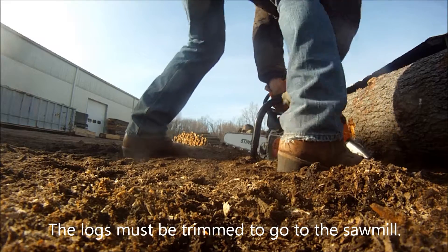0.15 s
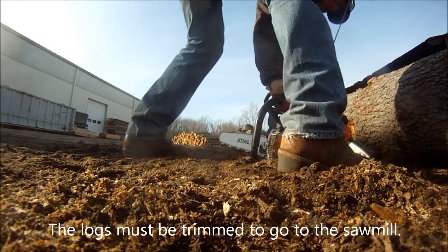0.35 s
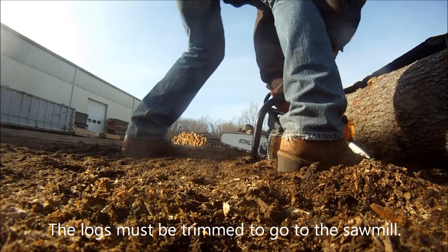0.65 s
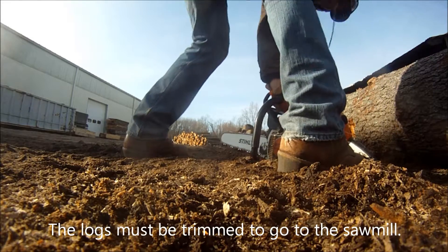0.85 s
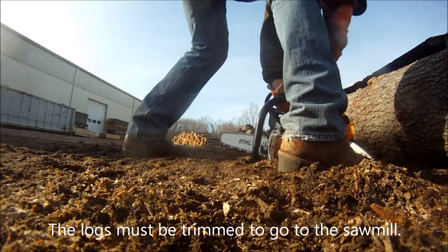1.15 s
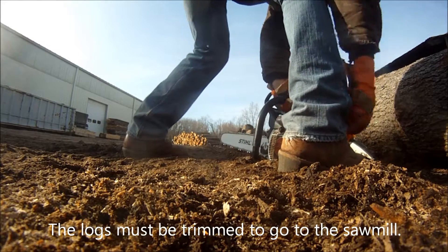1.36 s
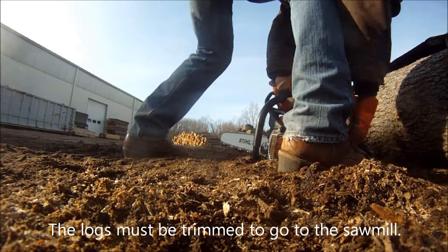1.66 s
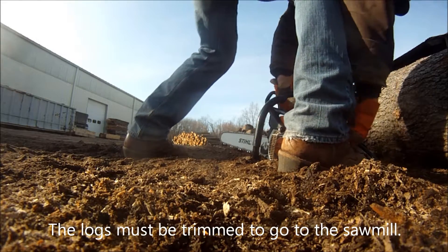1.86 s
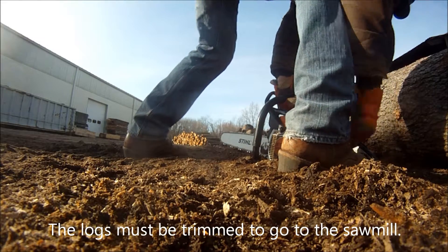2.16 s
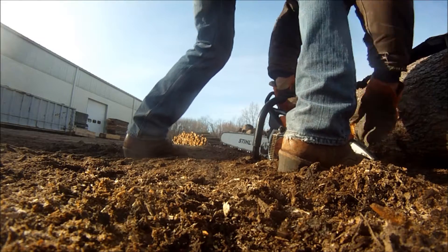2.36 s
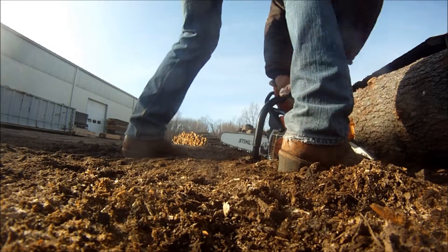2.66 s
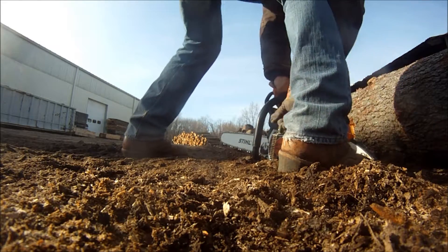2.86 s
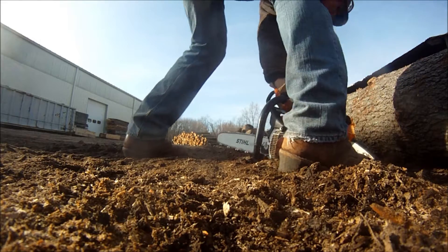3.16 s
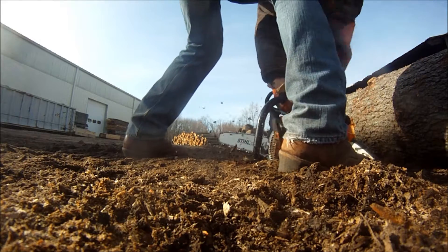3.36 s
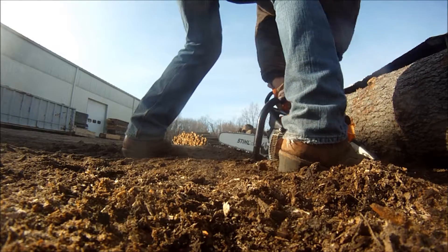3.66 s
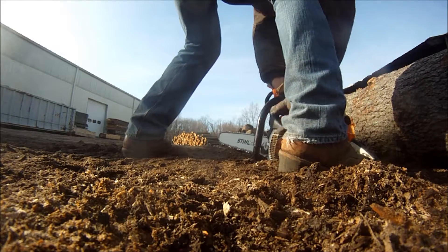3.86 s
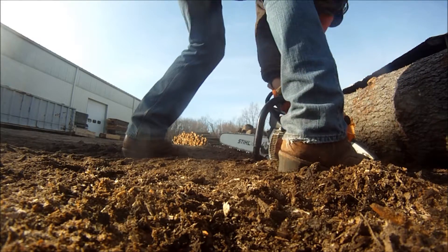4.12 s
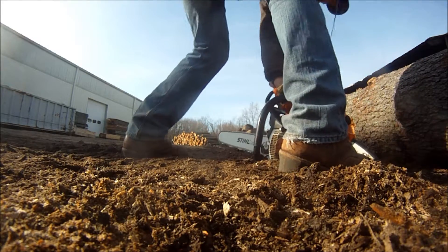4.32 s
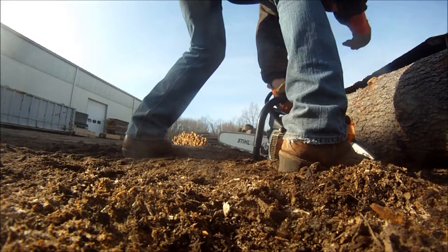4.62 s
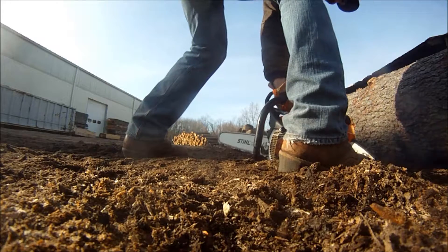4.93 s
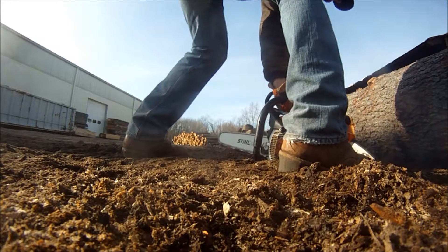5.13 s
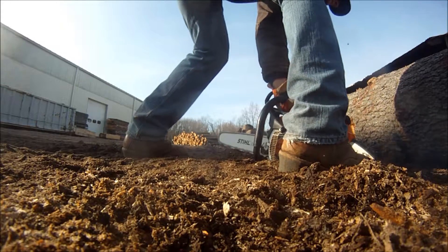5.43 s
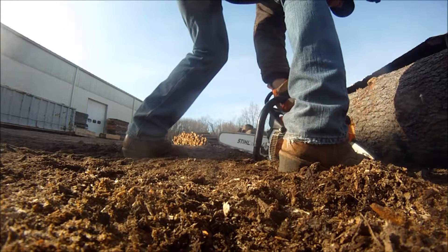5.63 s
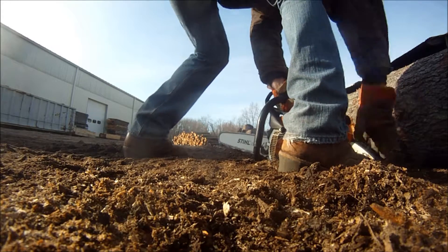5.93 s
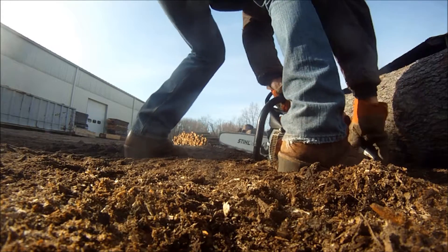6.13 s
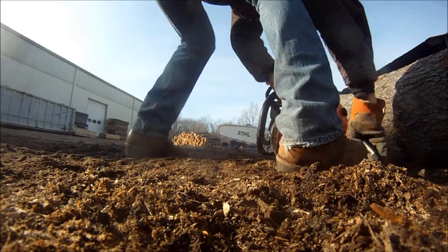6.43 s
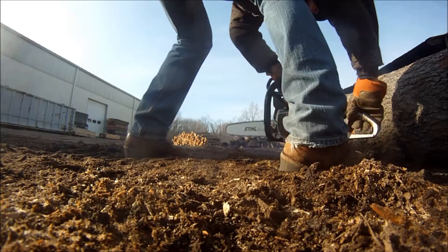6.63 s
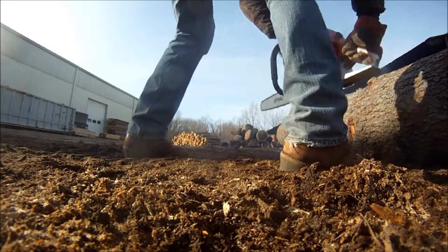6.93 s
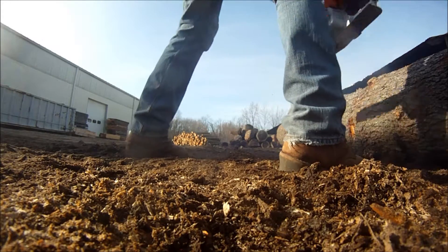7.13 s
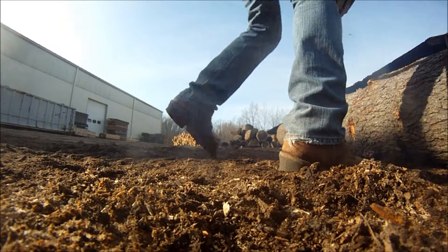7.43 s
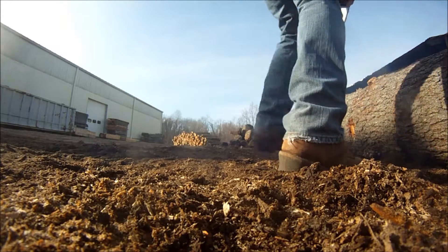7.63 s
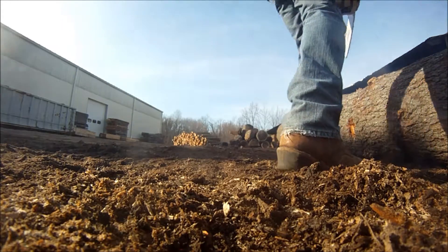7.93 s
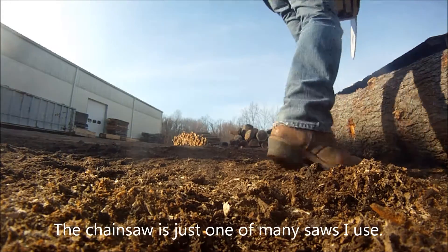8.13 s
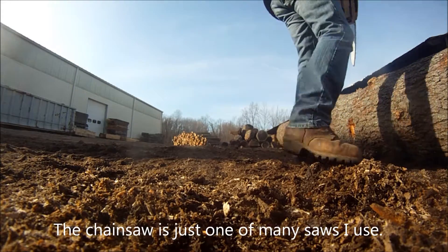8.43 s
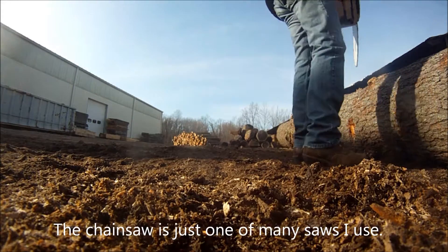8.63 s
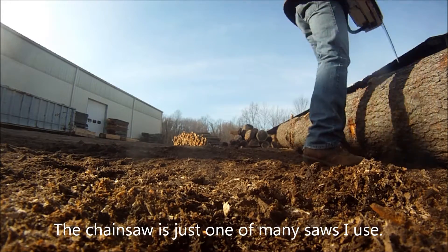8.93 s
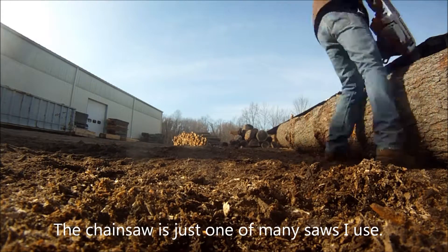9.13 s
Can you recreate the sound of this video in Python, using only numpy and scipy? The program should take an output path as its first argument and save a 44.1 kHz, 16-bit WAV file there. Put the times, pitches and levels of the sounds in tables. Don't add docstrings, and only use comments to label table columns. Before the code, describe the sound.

Outdoors over a faint diesel drone, failed chainsaw pulls clatter and putter out, then the two-stroke starts, buzzes fast, blips and cuts off.

```python
import sys
import numpy as np
from scipy import signal
from scipy.fft import rfft, irfft
from scipy.io import wavfile

SR = 44100
rng = np.random.default_rng(int(sys.argv[2]) if len(sys.argv) > 2 else 0)


def master(y):
    cut = np.clip(np.atleast_2d(y).T, -1, 1)
    pcm = np.round(cut * 32767)
    wavfile.write(sys.argv[1], SR, pcm.astype(np.int16))


def invert_db(level):
    return 10 ** (np.asarray(level, dtype=float) / 20)


N = 409240
TIME = np.arange(N) / SR

# (pitch_hz, width_hz, level_db)
PUMPING = [(155.9, 150, 3), (265.2, 175, 8)]
INTAKE = [(368.4, 128, 0.0024)]
MUFFLER = [(479, 114, 6), (612.7, 32, 2), (777, 43, -5.5)]
OUTLET = [(573.6, 150, 0)]
COVER = [(610, 130, 0), (720, 160, -4)]
# (time_s, low_casing_ring_db, intake_db, ground_bounce_lag_ms)
FLANK = [(6.1, 0.4, 1.7, 0.043), (6.18, -4, 19, 0.071), (6.3, 0.5, 14, .14), (6.7, 6, -1.5, 0.46),
         (6.95, 6.5, 5.5, .4), (7.15, -2, 8.5, 0.31), (7.35, -3, 0.5, .3), (8.9, 0.5, 1, 0.27)]


def in_time(rows):
    s, *columns = np.transpose(rows)
    return [np.interp(TIME, s, column) for column in columns]


def rms_one(x):
    return x / np.sqrt(np.mean(x ** 2) + 1e-20)


def noise():
    return rng.standard_normal(N)


def resonate(x, peaks, order):
    out = 0
    for k, (hz, width_hz, level_db) in enumerate(peaks):
        r = np.exp(-np.pi * max(width_hz, 20) / SR)
        top = [(1 - r * r) / 2, 0, (r * r - 1) / 2]
        bottom = [1, -2 * r * np.cos(2 * np.pi * hz / SR), r * r]
        ringing = x + 1e-18
        for _ in range(order):
            ringing = signal.lfilter(top, bottom, ringing)
        out = out + invert_db(level_db) * (-1) ** (k * order) * ringing
    return out


def unit_energy(x, peaks):
    soft = signal.butter(4, 760, fs=SR, output="sos")
    click = resonate(signal.sosfilt(soft, np.eye(1, SR // 10)[0]), peaks, order=2)
    heard = np.flatnonzero(x)
    busy = slice(heard[0], heard[-1] + SR // 10)
    out = np.zeros(N)
    ringing = resonate(signal.sosfilt(soft, x[busy] + 1e-18), peaks, order=2)
    out[busy] = ringing / np.sqrt(np.sum(click ** 2) / SR)
    return out


def clicks(times, gains):
    out = np.zeros(N)
    np.add.at(out, (np.asarray(times) * SR).astype(int), gains)
    return out


def swell(x, rise_s, fall_s):
    t = np.arange(int(.08 * SR)) / SR
    shape = np.exp(-t / fall_s) * (1 - np.exp(-t / rise_s))
    return signal.fftconvolve(x, shape / shape.max())[:N]


def after(s):
    return np.clip((TIME - s) / .018, 0, 1)


def slowing(first_s, gap_s, count):
    stretch = 1.158
    return first_s + gap_s * (stretch ** np.arange(count) - 1) / (stretch - 1)


def yard():
    # (time_s, turns_per_s, level_db)
    diesel = [(0, 43, -40), (2.36, 42.5, -41), (2.45, 41.5, -68), (2.7, 41, -56), (3.0, 40, -53),
              (3.36, 40, -53), (3.42, 34, -56), (4.2, 33, -54), (4.5, 33, -64), (8.2, 33, -66),
              (8.87, 33, -78)]
    # (level_at_high_idle_db, level_at_low_idle_db)
    diesel_parts = [
        (-13, -5),
        (-0.8, 3),
        (-26.5, 6),
        (-10, -1),
    ]
    # (pitch_hz, level_db per Hz)
    rumble_colour = [(12, -38), (20, -19.5), (103, -14), (124, -5), (169, -17), (458, -14.5), (1080, -40),
                     (3780, -44), (5800, -66), (7540, -83.5), (12800, -120)]
    speed, diesel_db = in_time(diesel)
    *orders_db, rumble_db = [diesel_db + np.interp(speed, [34, 40], part[::-1]) for part in diesel_parts]
    rumble_db = rumble_db + 13 * np.interp(TIME, [4.2, 4.5], [0, 1])
    turns = np.cumsum(speed) / SR
    slow = signal.butter(1, 6.0, fs=SR, output="sos")
    drone = 0
    for k, order_db in enumerate(orders_db):
        waver_db = 1.8 * rms_one(signal.sosfilt(slow, noise()))
        drone = drone + np.sqrt(2) * invert_db(order_db + waver_db) * np.sin(2 * np.pi * (k + 1) * turns)
    hz, level_db = np.transpose(rumble_colour)
    colour = invert_db(np.interp(np.log(np.fft.rfftfreq(N, 1 / SR) + 1), np.log(hz), level_db))
    rumble = rms_one(irfft(rfft(noise()) * colour, N))
    return drone + invert_db(rumble_db) * rumble


def clacks():
    # (time_s, bright_db, hollow_db, scrape_s)
    clack_rows = [(0.0503, -40.5, -30.5, 0.0018), (0.1267, -50.5, -40, 0.0022),
                  (0.226, -35.5, -19.5, 0.0059), (0.7705, -47, -49, 0.002), (0.827, -28, -11.5, 0.004),
                  (1.278, -21.5, -22, 0.0048), (1.6322, -24, -39, 0.0022), (2.0707, -39, -38, 0.0028),
                  (2.1316, -44.5, -53, 0.0066), (2.2109, -42, -38, 0.0034), (2.2566, -53, -49, 0.004),
                  (2.3486, -42.5, -35.5, 0.0017), (2.9928, -38, -21, 0.0036), (3.0864, -46, -39, 0.0016),
                  (3.2056, -22, -16.5, 0.0013), (3.2465, -44.5, -35, 0.0032),
                  (3.2701, -37.5, -21.5, 0.0018), (3.3764, -33, -16.5, 0.0035),
                  (3.4206, -42.5, -59, 0.0018), (3.4655, -38.5, -27, 0.003), (3.496, -50, -42, 0.0028),
                  (3.5688, -50, -37.5, 0.0048), (3.6227, -49.5, -48, 0.0068), (3.7299, -43.5, -47, 0.00092),
                  (3.776, -57, -55, 0.002), (4.1125, -43.5, -37, 0.0061), (4.1486, -41.5, -16, 0.0062),
                  (4.2178, -46.5, -39, 0.0031)]
    slaps = slowing(first_s=.4698, gap_s=.0515, count=5)
    rows = clack_rows + [(s, -41, -52 + 1.5 * k, .005) for k, s in enumerate(slaps)]
    scrape = np.zeros(N)
    t = np.arange(int(.06 * SR)) / SR
    for s, bright_db, _, scrape_s in rows:
        x = t / np.clip(scrape_s, .0003, .012)
        scrape[int(s * SR):][:len(t)] += invert_db(bright_db - 0.5) * x * np.exp(-x)
    s, _, hollow_db, _ = np.transpose(rows)
    hollow = unit_energy(clicks(s + 0.003, invert_db(hollow_db - 33.0)), COVER)
    return hollow, scrape * noise()


def cord():
    # (start_s, end_s, cover_db, casing_db)
    whirs = [
        (.228, 0.458, -45, -59.5),
        (0.837, .9, -41, -61),
        (3.004, 3.092, -52.5, -69.5),
        (4.107, 4.19, -47.5, -63),
    ]
    hollow, bright = np.zeros((2, N))
    for start_s, end_s, cover_db, casing_db in whirs:
        runs = after(start_s) - after(end_s)
        hollow = hollow + invert_db(cover_db) * runs
        bright = bright + invert_db(casing_db) * runs
    return hollow * rms_one(resonate(noise(), COVER, order=2)), bright * noise()


def cracks():
    # (time_s, peak_db)
    kickbacks = [(0.8276, -26), (1.278, -33), (1.953, -34), (2.9966, -37.5), (3.0867, -32), (3.2042, -33.5),
                 (3.3773, -34.5), (4.147, -33.5), (4.218, -24)]
    s, peak_db = np.transpose(kickbacks)
    hits = clicks(s + 0.00084, -invert_db(peak_db + 23.0))
    return resonate(hits, [(1090, 1020, 7.5), (1780, 600, -17)], order=2)


def strokes():
    # (time_s, peak_db)
    single_strokes = [(0.259, -28), (1.933, -14), (1.951, -10), (1.976, -19), (2.005, -17), (2.036, -15),
                      (2.059, -20), (2.1, -18), (2.122, -25), (2.181, -28), (2.194, -29), (2.216, -31),
                      (3.024, -31), (3.085, -18), (3.104, -26), (3.119, -24), (3.14, -26), (3.16, -23),
                      (3.185, -23), (3.205, -17), (3.231, -35), (3.253, -25), (3.302, -33), (3.325, -31),
                      (3.362, -28), (3.376, -17), (3.435, -34), (4.193, -12), (4.216, -9)]
    saw_air = PUMPING + INTAKE + MUFFLER
    down = slowing(first_s=.313, gap_s=.0305, count=10)
    down_db = -16 - 1.3 * np.arange(len(down))
    s, peak_db = np.transpose(sorted(single_strokes + list(zip(down, down_db))))
    hits = clicks(s + 0.00086, invert_db(peak_db))
    thud = invert_db(-30.5) * unit_energy(hits, [(203, 260, -0.42), (396, 220, -1.1)])
    bounce = invert_db(-11) * np.roll(thud, int(.008 * SR))
    breath = swell(hits, rise_s=.006, fall_s=.02)
    puff = invert_db(-29) * breath * rms_one(resonate(noise(), saw_air, order=2))
    gap = np.diff(s, append=9)
    late = clicks(s + np.minimum(0.35 * gap, .03), invert_db(peak_db - 39) * (gap > .028))
    return thud + bounce + unit_energy(late, saw_air) + puff, invert_db(-47.5) * breath * noise()


def firing_times(rows):
    out = []
    for (s, hiss_db, steps), (next_s, _, _) in zip(rows, rows[1:] + rows[-1:]):
        k = np.arange(max(round(steps), 1))
        uneven_db = -0.5 + 3.5 * rng.standard_normal(len(k))
        out += zip(s + k * (next_s - s) / len(k), hiss_db + (k > 0) * uneven_db)
    return out


def firings():
    # (time_s, hiss_db, even_steps_to_next_row)
    pull_firings = [(0.897, -39.5, 1), (0.989, -42, 1), (1.009, -39, 1), (1.134, -43, 1), (1.196, -40, 4),
                    (1.3, -43.5, 2), (1.381, -52.5, 4), (1.477, -55.5, 2), (1.537, -51.5, 2),
                    (1.641, -44, 1), (1.66, -45.5, 1), (1.721, -47.5, 1), (1.766, -50.5, 3),
                    (1.843, -53.5, 2), (1.905, -52.5, 1)]
    # (time_s, hiss_db, even_steps_to_next_row)
    run_firings = [(4.294, -47.5, 3), (4.428, -47.5, 4), (4.532, -46.5, 4), (4.643, -47, 3),
                   (4.709, -46.5, 2), (4.773, -45, 3), (4.887, -43.5, 1), (4.931, -46, 2),
                   (5.002, -45.5, 1), (5.04, -46, 2), (5.13, -47.5, 3), (5.249, -49.5, 1), (5.335, -43, 3),
                   (5.471, -50.5, 3), (5.587, -48.5, 2), (5.674, -49.5, 2), (5.753, -46, 5),
                   (5.947, -46.5, 3), (6.08, -50.5, 2), (6.147, -47, 4), (6.232, -64, 1)]
    s, hiss_db = np.transpose(firing_times(pull_firings) + firing_times(run_firings))
    lit = swell(clicks(s, invert_db(hiss_db)), rise_s=.007, fall_s=0.0073)
    boom = rms_one(resonate(noise(), OUTLET, order=2))
    kick = unit_energy(clicks(s + .003, invert_db(hiss_db - 6)), [(331, 310, 0)])
    return invert_db(12.0) * lit * boom + kick, invert_db(-1.0) * lit * noise()


def thumps():
    # (time_s, peak_db)
    lone_firings = [(7.738, -31.5), (7.791, -34.5), (7.852, -43), (7.919, -31), (7.961, -30), (8, -35),
                    (8.051, -30.5), (8.221, -30.5), (8.27, -34), (8.328, -36), (8.39, -33), (8.449, -31.5),
                    (8.521, -35), (8.578, -34.5), (8.629, -38), (8.679, -39.5), (8.728, -43), (8.757, -40),
                    (8.799, -56), (8.85, -44)]
    s, peak_db = np.transpose(lone_firings)
    return unit_energy(clicks(s, invert_db(peak_db - 24)), [(83, 300, 0.5), (314, 370, -1)])


def casing(rattle):
    # (pitch_hz, width_hz, level_db)
    casing_peaks = [(1166, 170, 2.5), (1550, 440, -4.5), (2166, 170, 0), (2473, 108, 3.5), (2940, 227, 6),
                    (3868, 238, 0), (5035, 407, -6), (1231, 16, 2)]
    ring_db, _, lag_ms = in_time(FLANK)
    rung = invert_db(ring_db) * resonate(rattle, casing_peaks[:2], order=1)
    rung = rung + resonate(rattle, casing_peaks[2:], order=1)
    ground = invert_db(-10)
    rung = (rung + ground * np.interp(TIME - lag_ms / 1000, TIME, rung)) / (1 + ground)
    return rung / np.sqrt(np.sum(resonate(np.eye(1, SR)[0], casing_peaks, order=1) ** 2))


def engine(speed, levels, span, second_turn, second_db, shake_db, gate):
    pumping_db, intake_db, exhaust_db, rattle_db = levels
    on = (TIME >= span[0]) & (TIME < span[1])
    turns = np.cumsum(speed * on) / SR - 1 / SR
    size = invert_db(.8 * rng.standard_normal((2, 800)))
    pulses = 0
    for k, (lag, gain) in enumerate([(0, 1), (second_turn, invert_db(second_db))]):
        count = np.floor(turns - lag).astype(int)
        starts = np.diff(count, prepend=count[0]) > 0
        pulses = pulses + gain * starts * on * size[k, count % 800]
    pulses = pulses / np.sqrt(speed)
    blowing = (1 - gate * (turns % 1)) * on * noise()
    gas = invert_db(-16) * blowing / np.sqrt(SR)
    push = pulses + gas
    shake = invert_db(pumping_db + shake_db) * on * np.minimum(speed / 65, 1) ** 2 * np.sin(2 * np.pi * turns)
    pumping = unit_energy(invert_db(pumping_db - 4.5) * push, PUMPING)
    intake = unit_energy(invert_db(intake_db) * push, INTAKE)
    exhaust = unit_energy(invert_db(exhaust_db - 7.0) * push, MUFFLER)
    rasp = unit_energy(invert_db(exhaust_db + 8) * gas * speed / 130, OUTLET)
    slap = invert_db(-3) * np.sqrt(SR) * pulses
    return shake + pumping + intake + rasp + exhaust, invert_db(rattle_db) * (blowing + slap)


def pull_controls():
    # (time_s, turns_per_s)
    pull_speed = [(0.896, 47.68), (0.99, 51.66), (1.02, 66.67), (1.13, 61.77), (1.27, 57.53), (1.4, 43.83),
                  (1.626, 22.03), (1.636, 54.6), (1.925, 27.6)]
    # (time_s, effort_db)
    pull_effort = [(0.896, -0.5), (1.026, 1.5), (1.3, -5), (1.46, -13), (1.616, -15), (1.642, 1.5),
                   (1.852, -19.5), (1.925, -17.5)]
    # (level_db, share_of_effort)
    pull_layers = [
        (-25.5, 0.0027),
        (-33.5, .55),
        (-24, 0.56),
        (-47.5, 1.1),
    ]
    effort_db, = in_time(pull_effort)
    return in_time(pull_speed)[0], [level_db + share * effort_db for level_db, share in pull_layers]


def run_controls():
    # (time_s, turns_per_s)
    warm_up = [(4.28, 52.5), (4.32, 67), (4.42, 71), (4.6, 105.7), (4.74, 118.2), (4.98, 126.5),
               (5.3, 132.5), (5.76, 124.8), (5.9, 129.9)]
    # (open_s, turns_per_s, shut_s, turns_per_s)
    blips = [(6.15, 132.2, 6.25, 148), (6.815, 80.5, 6.94, 121.1), (7.085, 102.8, 7.19, 124),
             (7.29, 109, 7.45, 137.5), (7.64, 119.8, 7.78, 138.1)]
    # (time_s, turns_per_s)
    settle = [(8.17, 114.4), (8.63, 110.5), (8.8, 103.4)]
    # (time_s, nearness_db, rattle_db)
    carry = [(4.24, -10, -64.5), (4.5, -2, -62.5), (4.75, 0.5, -53.5), (6.2, 1, -54), (6.4, 0.5, -45),
             (6.72, -1, -44), (6.88, -1.5, -51.5), (7.05, -4, -44), (7.3, -6, -41), (7.7, -8.5, -45.5),
             (8.2, -9.5, -44.5), (8.62, -18.5, -52), (8.84, -41, -60)]
    # (pressed_s, surge_db, released_s, loss_of_firing_db, recovery_s)
    trigger = [(6.15, 3, 6.252, -10.5, .25), (6.81, 2.5, 6.925, -11, .09), (7.064, 8, 7.175, -8.5, .07),
               (7.26, 9.5, 7.42, -2.5, .12), (7.595, 8, 7.71, -3, .12), (8.13, 0.5, 8.228, -7.5, .06)]
    # (level_db, share_of_nearness, share_of_surge, share_of_loss, db per turn per s under fast idle)
    run_layers = [
        (-30, 0.45, 1.02, 0.75, 0.0661),
        (-44, 0.78, .6, .3, 0.3467),
        (-22.5, 1.007, 0.98, 0.77, 0.1043),
    ]
    fast_idle = 130
    speed, = in_time(warm_up + np.reshape(blips, (-1, 2)).tolist() + settle)
    near_db, rattle_db = in_time(carry)
    surge = cut = 0
    for on_s, surge_db, off_s, loss_db, back_s in trigger:
        fading = np.exp(-np.abs(TIME - on_s) / .2)
        surge = surge + surge_db * (after(on_s) - after(off_s)) * fading
        cut = cut + loss_db * after(off_s) * np.exp(-np.abs(TIME - off_s) / back_s)
    under = fast_idle - np.maximum(speed, 72)
    pumping_db, intake_db, exhaust_db = [
        level_db + near * near_db + air * surge + lull * cut + slow * under
        for level_db, near, air, lull, slow in run_layers]
    _, facing_db, _ = in_time(FLANK)
    levels = pumping_db, intake_db + facing_db, exhaust_db, rattle_db + .1 * (surge + cut)
    shake_db = -2 + 0.33 * (surge + cut) - 0.0676 * (fast_idle - speed)
    return speed, levels, shake_db


def scene():
    # (time_s, level_db)
    cuts = [(0, 1.5), (2.357, 0), (2.362, -60), (2.42, -44), (2.46, -0.5), (8.866, 1.5), (8.872, -23.5),
            (8.9, -18), (8.905, -130), (9.3, -130)]
    pulled = engine(*pull_controls(), span=(.8945, 1.93), second_turn=.45, second_db=-7.5,
                    shake_db=-10.5, gate=0.2)
    speed, levels, shake_db = run_controls()
    running = engine(speed, levels, span=(4.2355, 8.95), second_turn=.47, second_db=-14.5,
                     shake_db=shake_db, gate=0.073)
    body, rattle = np.sum([pulled, running, strokes(), firings(), clacks(), cord()], axis=0)
    mix = yard() + cracks() + thumps() + body + casing(rattle)
    return (mix * invert_db(in_time(cuts)[0]))[None]


def low_pass(x):
    return signal.sosfilt(signal.butter(12, 16450, fs=SR, output="sos"), x)


def record(dry):
    hold_hz, cutoff_hz, top = 12000, 15900, .3
    hz = np.fft.rfftfreq(N, 1 / SR)
    rounded = dry / (1 + (dry / top) ** 4) ** (1 / 4)
    base = irfft(rfft(rounded) * (hz < hold_hz / 2), N)
    mirrored = base * (1 + 2 * np.cos(2 * np.pi * hold_hz * TIME))
    held = irfft(rfft(mirrored) * np.sinc(hz / hold_hz) * (hz < cutoff_hz), N)
    return low_pass(held)


dry = scene()
out = record(dry)
master(out)
```